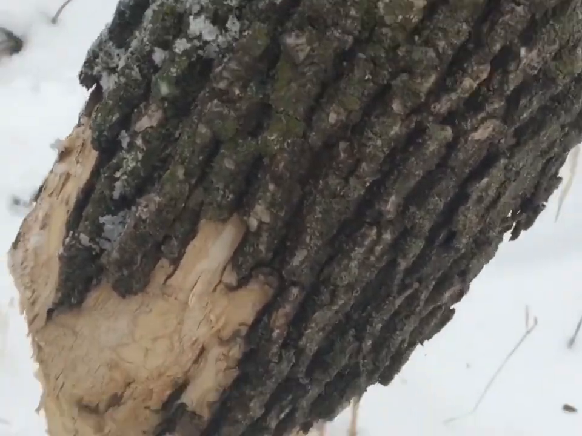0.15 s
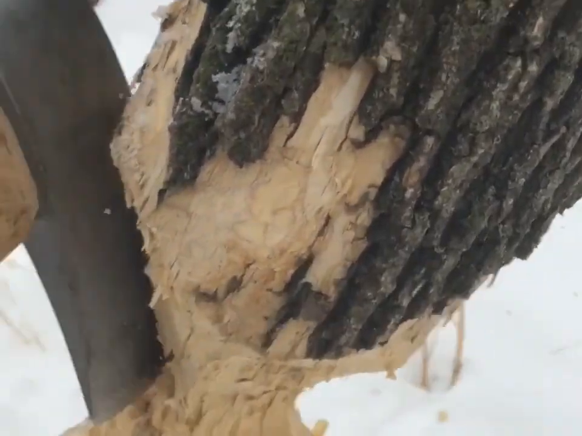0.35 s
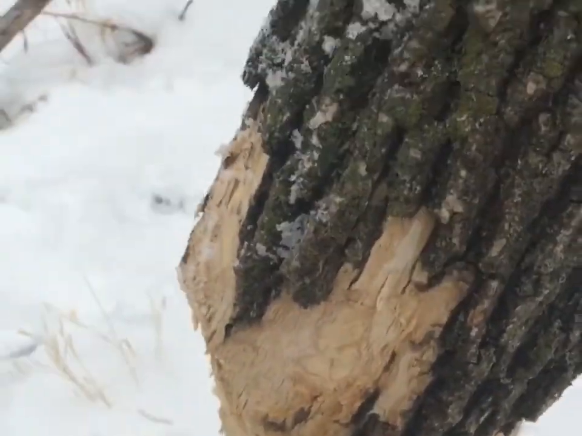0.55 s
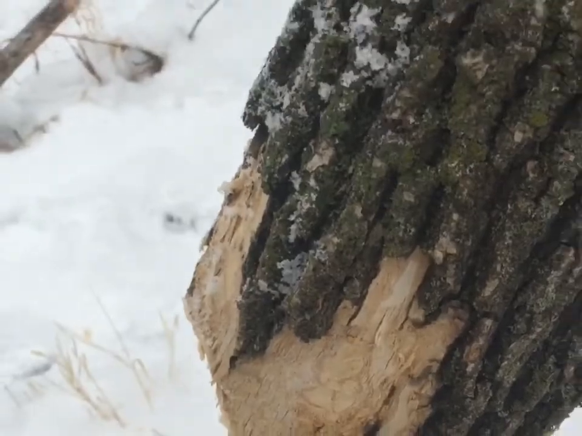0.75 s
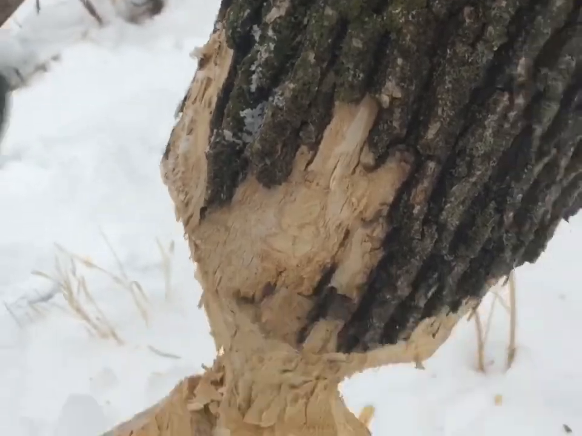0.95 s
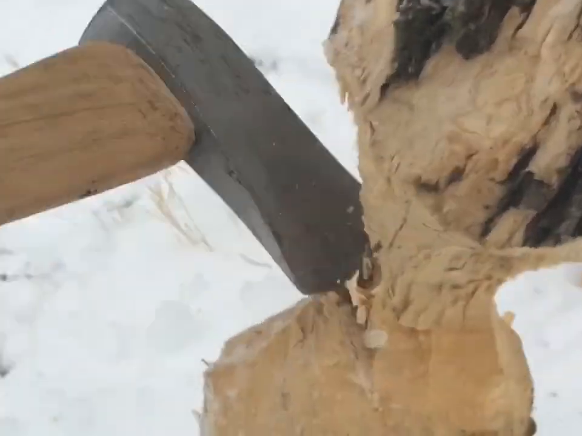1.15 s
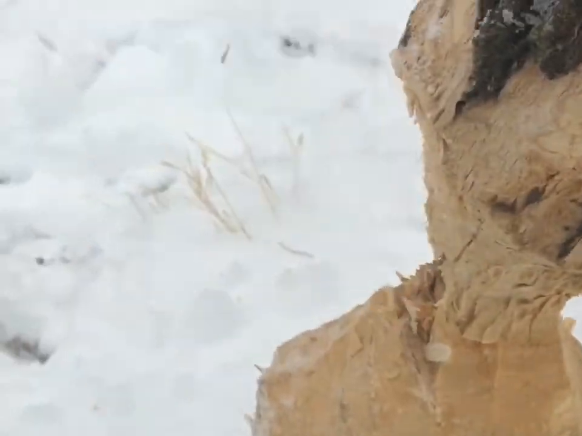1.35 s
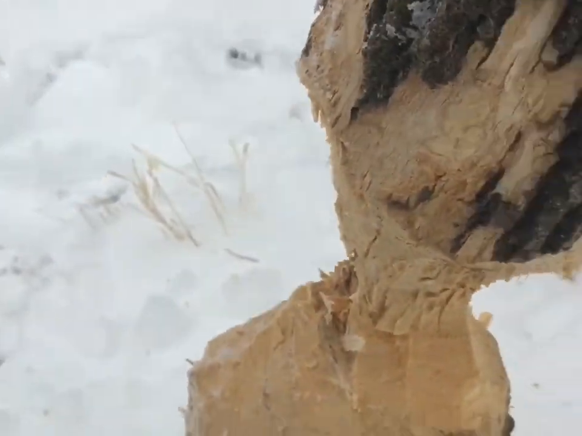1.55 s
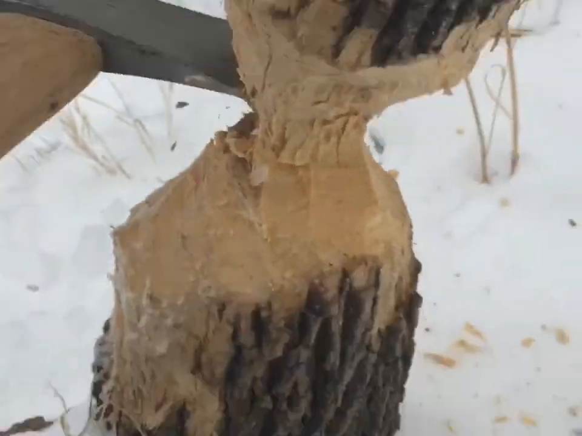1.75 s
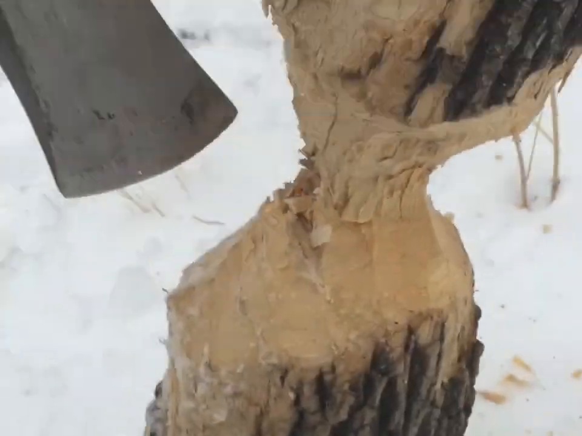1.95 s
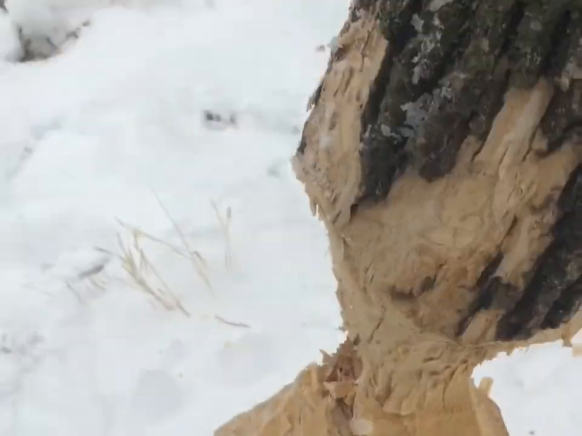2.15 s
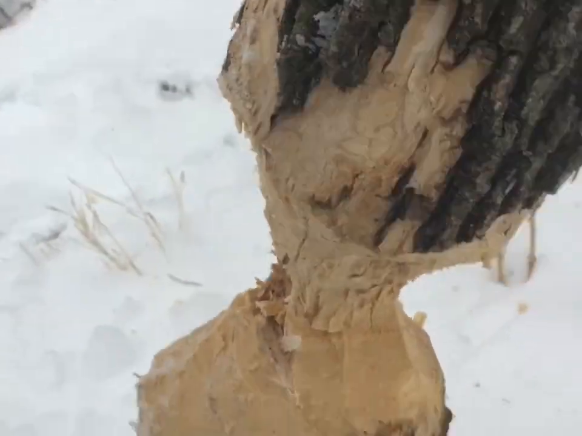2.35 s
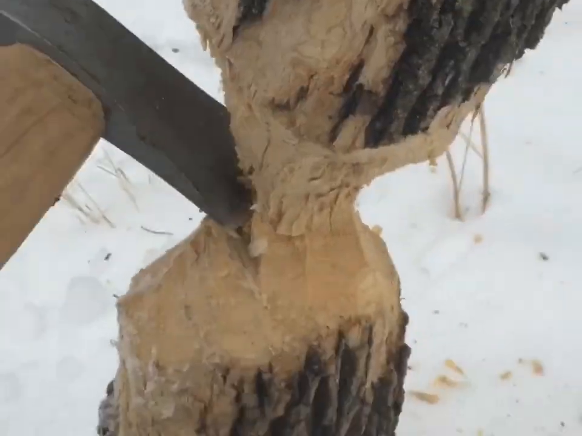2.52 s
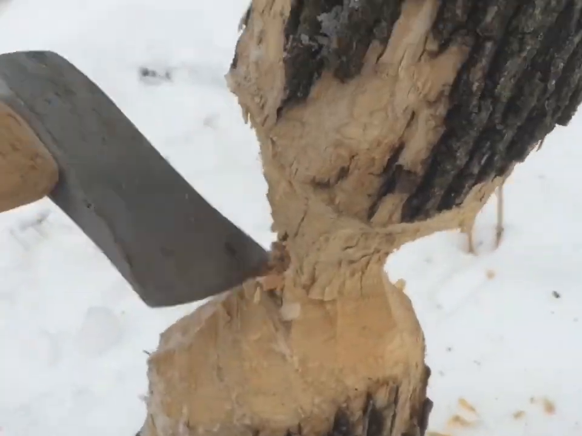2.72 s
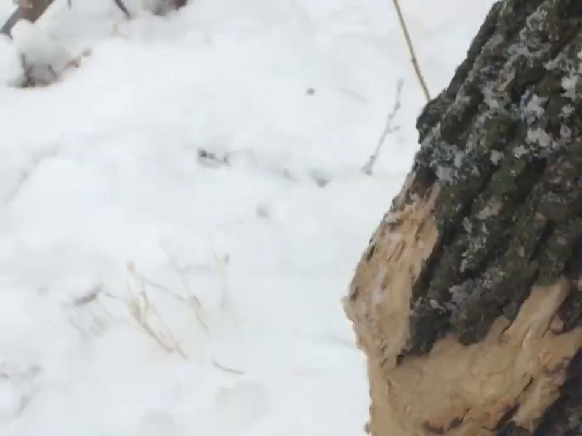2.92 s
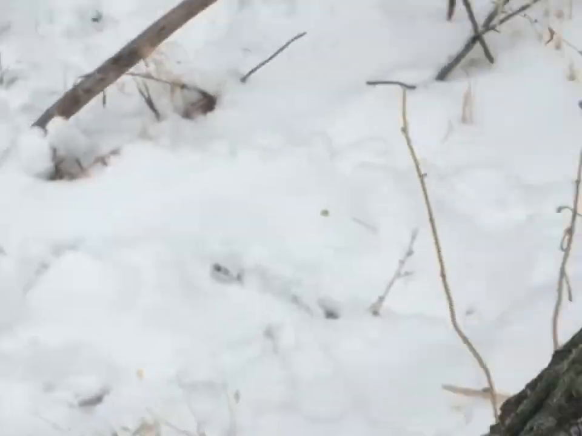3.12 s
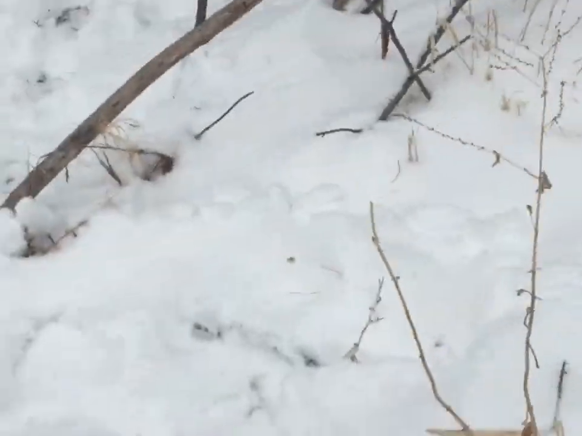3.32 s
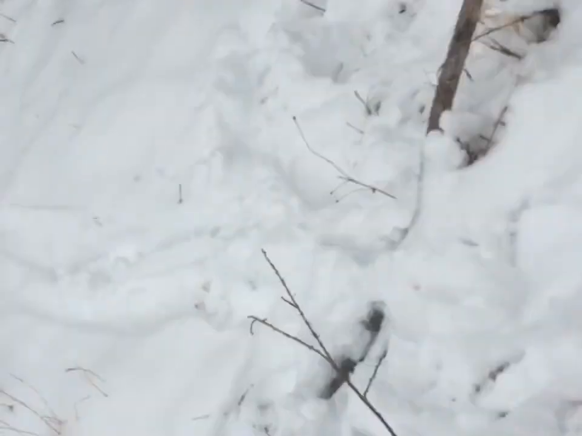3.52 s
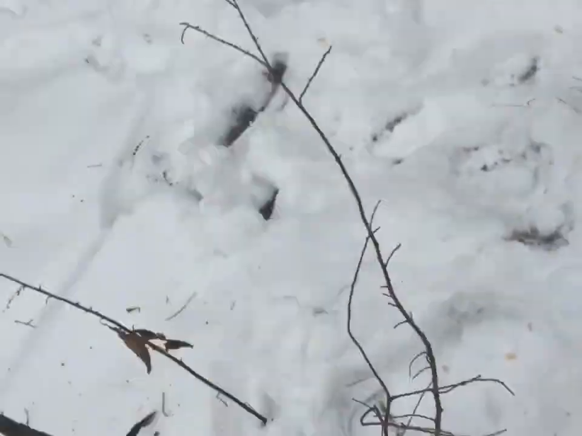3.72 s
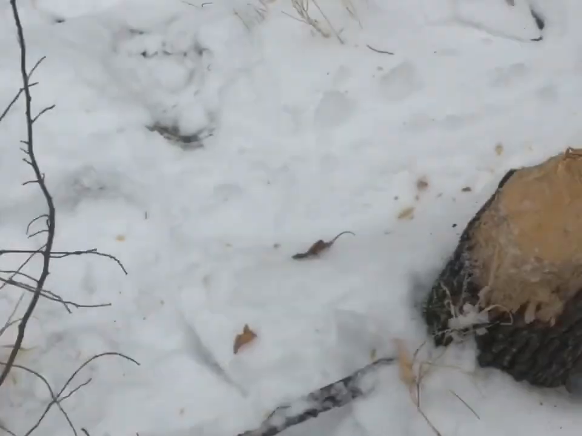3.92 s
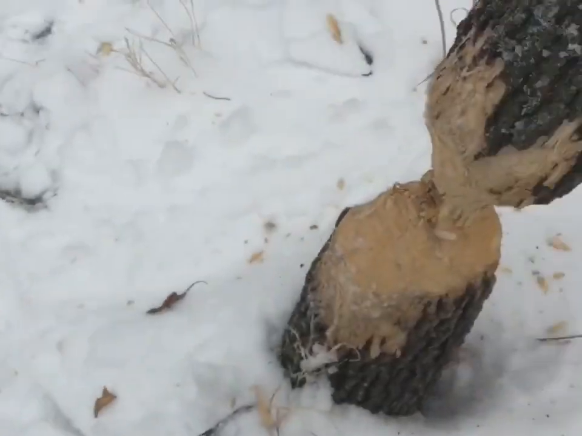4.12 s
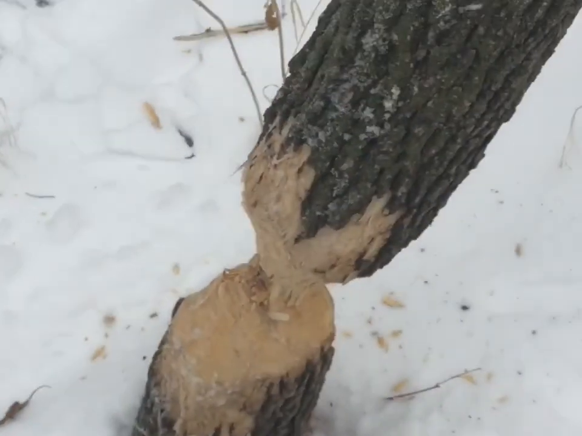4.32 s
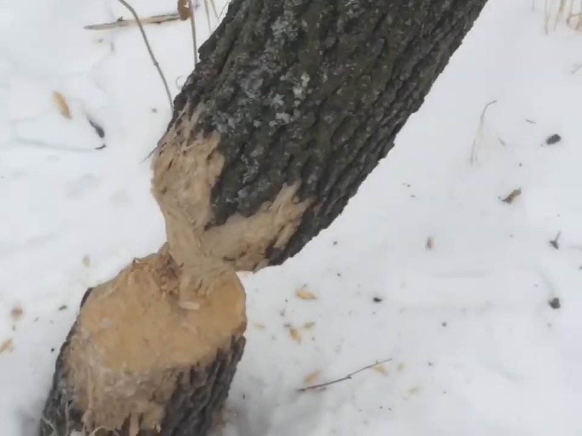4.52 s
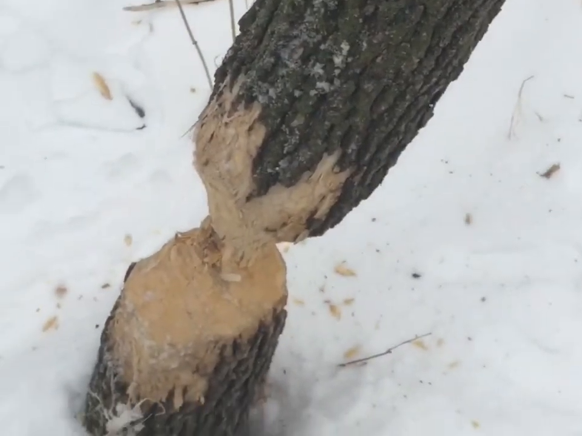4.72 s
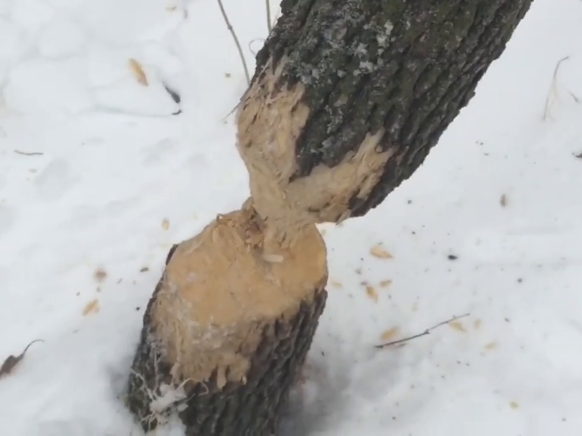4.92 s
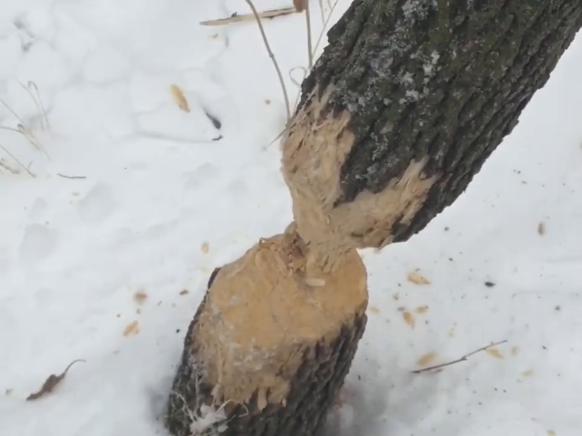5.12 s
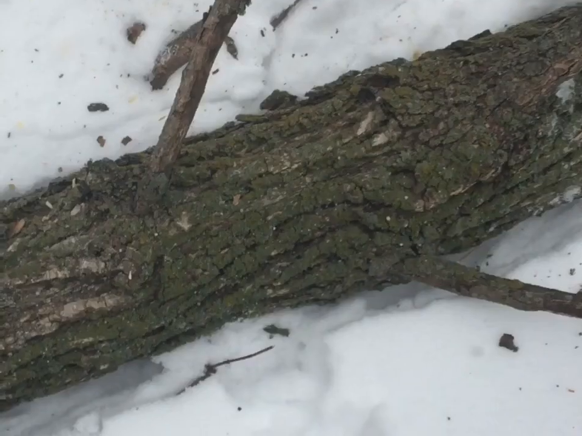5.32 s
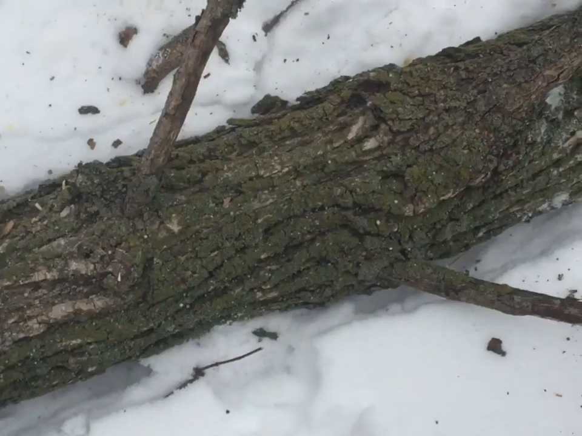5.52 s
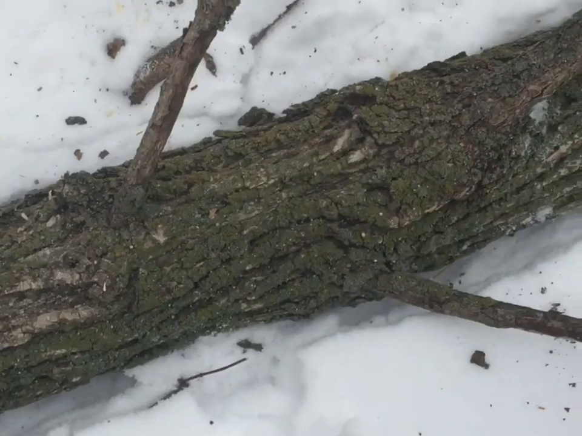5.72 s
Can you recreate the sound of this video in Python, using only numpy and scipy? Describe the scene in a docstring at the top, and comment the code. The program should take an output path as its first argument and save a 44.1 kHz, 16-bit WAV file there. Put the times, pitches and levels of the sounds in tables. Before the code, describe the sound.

A hatchet chops into a tree trunk four times, at about 0.3, 1.1, 1.8 and 2.5 seconds, so close that the blows overload the microphone. Each is a sharp crack of fibres with a woody knock and a short low boom, followed by a faint, dark echo from the woods. The steel head clinks lightly just after the first two chops and rings brightly on the third. The blade scrapes faintly as it is worked free, and a stiff jacket swishes between swings.

From about 2.8 seconds everything is much quieter. The jacket rustles, and boots press into snow with dull, soft crunches from 3.4 to 4.5 seconds, ending in a very faint squeak. Small snaps of twigs or chips and soft bumps are scattered throughout, the clearest snap near 3.4 seconds. The last soft knocks fall around 5 seconds, leaving still air and a faint low rumble until nearly 6.

```python
"""Hatchet on a leaning trunk

Snowy woods, one microphone so close to the notch that the four chops overload it. Each chop cracks the
fibres, knocks and sets the trunk booming; the steel head rings when it glances off or comes free.
A jacket swishes between swings, then feet shift in the snow and a few soft knocks follow.
Behind it all lie a faint echo from the trees and still winter air."""
import sys
import numpy as np
from scipy import signal
from scipy.fft import rfft, irfft
from scipy.io import wavfile

SR = 44100
rng = np.random.default_rng(int(sys.argv[2]) if len(sys.argv) > 2 else 0)


def put_to_file(sound):
    """Save the sound as 16-bit audio at rate SR, in the file named by the first command-line argument."""
    columns = np.atleast_2d(sound).T  # one column per channel
    safe = np.clip(columns, -1, 1)
    whole_steps = np.round(safe * 32767)
    wavfile.write(sys.argv[1], SR, whole_steps.astype(np.int16))


N = 254016
TIME = np.arange(N) / SR
AGE = np.arange(SR) / SR  # seconds since a blow
BRIEF = SR // 8  # samples in which a small sound dies away
TOP_HZ = 16400  # upper edge of the microphone's range

# chops: t/s, trunk/dB, push length/s, knock f/Hz, knock/dB, crack/dB, crack brightness/dB, steel/dB
CHOPS = [(0.3196, 1, 0.0023, 1103, 10, 8.5, -7, -47), (1.0712, 3, 0.00069, 1014, 9, 7.5, 0, -41),
         (1.7931, 1, .0034, 746, 3.5, 5, 5.5, -8), (2.5480, 2, 0.0021, 1022, 8, 8, -2.5, -42.5)]
# bending modes of the trunk: f/Hz, level/dB, t60/s
TRUNK_MODES = [(52, -31, 0.3), (72, -29.5, 0.51), (80.6, -5.5, 0.11), (98.4, -3, 0.044), (121, -32, 0.44),
               (136, 1, 0.069), (145, -12, .124), (189, -19.5, 0.17), (226, -17, 0.11), (252, -11.5, 0.076),
               (284, -3.5, 0.053), (317, -7, 0.105), (430, -7, 0.065), (475, -19, .07), (582, -16, .075),
               (667, -21, 0.06)]
# side modes of the cut: f/knock pitch, level/dB, t60/s
KNOCK_MODES = [(.4, -11, .035), (.77, -9, .024), (1.28, -18, .02), (1.7, -17, .02), (2.25, -18, .016)]
# modes of the steel head, the blade's two flexing modes first: f/Hz, level/dB, t60/s
STEEL_MODES = [(3454, -1.5, 0.07), (3550, -4.5, 0.055), (4480, 2, 0.027), (7100, -21.5, .033),
               (8400, -23, 0.067), (11350, -23, .034), (12400, -28, .036)]
# wood tapped by the blade: f/Hz, level/dB, t60/s
CLACK_MODES = [(450, -3, 0.023), (1120, 0.5, 0.015), (1850, -13.5, 0.02)]
# the blade touches the wood: t/s, steel/dB, its upper modes/dB, clack/dB, tick/dB
TOUCHES = [(0.3691, -20.5, -10, -8, -18.5), (1.114, -47, 1, -56, -37), (1.192, -66, 19, -64, -47),
           (1.21, -22.5, 6, -28, -24.5), (1.847, -57, 3, -42.5, -36), (1.893, -45.5, 9.5, -63, -43)]
# the blade is levered out of the cut: t/s, length/s, level/dB
SCRAPES = [(0.359, 0.028, -36), (0.407, 0.072, -59.5), (1.806, 0.11, -49.5), (1.901, 0.09, -59.5),
           (1.99, 0.1, -57), (2.682, 0.08, -61), (2.753, 0.18, -50.5)]
# twigs and chips snap: t/s, peak/dB, f/Hz, width/Hz
SNAPS = [(0.298, -29, 1090, 875), (0.309, -28.5, 1040, 1090), (1.013, -41, 594, 340),
         (1.324, -31.5, 1790, 2940), (1.355, -35, 780, 1200), (1.648, -38.5, 2140, 2470),
         (2.114, -44, 3570, 2500), (2.315, -49, 700, 900), (2.527, -39.5, 882, 1300),
         (2.590, -35, 4000, 8000), (2.767, -36, 875, 2480), (3.283, -41, 2155, 1270),
         (3.353, -25, 660, 1380), (3.354, -33.5, 4470, 7000), (3.445, -35, 7020, 8940),
         (3.781, -33, 1210, 2000), (4.428, -38.5, 1607, 990), (4.628, -39, 694, 738),
         (4.899, -49, 7020, 9000), (4.991, -45, 497, 796)]
# dull bumps of boots and hands: t/s, peak/dB, f/Hz
BUMPS = [(0.074, -48, 70), (1.321, -37.5, 267), (1.354, -34, 312), (1.976, -40, 383), (2.316, -44.5, 200),
         (2.934, -35, 262), (3.428, -39.5, 261), (3.473, -39.5, 136), (3.491, -37.5, 55),
         (3.572, -38.5, 161), (3.752, -35.5, 153), (3.816, -39, 163), (3.941, -42.5, 280),
         (4.212, -43, 156.4), (4.268, -47.5, 518), (4.301, -45.5, 89.7), (4.422, -44, 170),
         (4.626, -35, 160.7), (4.992, -35.5, 170), (5.342, -51.5, 404.5)]
# movements that rub the jacket: fastest at t/s, rise/s, fall/s, swish/dB, hiss/dB
STROKES = [(0.008, 0.02, 0.025, -46.5, -54), (0.45, 0.21, .035, -62.5, -57),
           (0.548, 0.031, 0.053, -44, -51), (0.701, 0.16, 0.042, -53, -60), (1.309, .06, .2, -47, -56.5),
           (1.45, 0.18, 0.073, -43, -48), (1.486, 0.033, 0.021, -36.5, -50),
           (2.025, 0.1, 0.081, -43, -54.5), (2.066, .04, 0.026, -44.5, -57.5),
           (2.719, .17, 0.034, -58.5, -68), (2.81, .06, 0.12, -46, -51),
           (2.883, 0.054, 0.043, -39.5, -44.5), (2.94, 0.12, 0.14, -49.5, -54.5),
           (3.28, 0.38, 0.33, -61, -70.5), (3.45, .09, 0.085, -53.5, -60.5),
           (3.748, 0.044, 0.066, -47, -58), (3.72, 0.15, 0.33, -52.5, -63), (3.925, .13, 0.12, -41.5, -50),
           (4.20, .19, 0.15, -53, -62), (4.232, .03, .028, -73, -49), (4.41, .13, 0.13, -60, -67.5)]
# boots press the snow: full weight at t/s, rise/s, fall/s, level/dB
STEPS = [(3.43, 0.039, 0.089, -52.5), (3.619, 0.12, 0.18, -50.5), (3.76, 0.074, 0.095, -44.5),
         (3.92, 0.2, .11, -42), (4.23, .1, 0.12, -56.5), (4.42, .08, 0.092, -57.5)]
# echo from the trees: f/Hz, level/dB, t60/s
ECHO_BANDS = [(39.84, -15, .8), (90, 2, 1), (310, -2, 1), (705, -9, 0.8), (1520, -19, 0.92),
              (4000, -18.5, .3), (15000, -26.5, .25)]
# rumble of air on the microphone: t/s, level/dB
RUMBLE_LEVELS = [(0, -66), (.9, -63.5), (1.6, -61.5), (2.3, -65), (3.1, -60), (3.8, -56), (4.5, -65.5),
                 (5.2, -70), (5.76, -78.5)]

# spectra of the noisy sources: f/Hz, level/dB
FIBRE_SPECTRUM = [(300, -12), (900, -2), (1800, 1.5), (2600, -3), (4200, 3.5), (6000, -4), (9000, -5),
                  (15000, -12.5)]
CLOTH_SPECTRUM = [(290, -37), (500, -11.5), (631, -7), (1400, -8), (2100, -1), (3390, -6), (3650, -4),
                  (3920, -4.5), (4940, -11), (9220, -11), (10500, -19.5), (13100, -15.5), (16000, -25.5)]
SNOW_SPECTRUM = [(35, -12.5), (60, 5.5), (113, 0.5), (445, -4), (559, -1.5), (753, -14.5), (1150, -14),
                 (1630, -12), (1950, -50), (4000, -17.5), (5200, -24), (8800, -70)]
AIR_SPECTRUM = [(15, -48.5), (25, -21.5), (43, -4.5), (64, -11), (145, -24), (1480, -27), (4030, -30),
                (5000, -31.5), (6380, -30), (10400, -38), (11600, -37.5), (16000, -43)]
GUST_SPECTRUM = [(120, -3.5), (280, 1.5), (600, -10.5), (1500, -20.5), (4000, -36)]
FOLD_SPECTRUM = [(900, -5.5), (2200, -1), (3800, 1), (6000, -15)]
SCATTER_SPECTRUM = [(300, -2.5), (420, 3), (600, 3.5), (1080, -4), (1450, -12), (2200, -18.5),
                    (4000, -25.5)]
RUMBLE_SPECTRUM = [(35, -10.5), (60, -4), (150, -5.5), (400, -15.5), (1200, -20.5)]


def chops(knock_lag_s=0.0004, stop_s=0.0055):
    """Right at the microphone the edge cracks in, the cut knocks and the stopping head booms the trunk."""
    out = np.zeros(N)
    for s, trunk_db, push_s, knock_hz, knock_db, crack_db, bright_db, steel_db in CHOPS:
        add(out, s, undb(crack_db) * crack(bright_db) + woods())
        add(out, s, undb(steel_db) * steel(upper_db=-14.5))
        add(out, s + knock_lag_s, undb(knock_db) * knock(knock_hz))
        add(out, s + stop_s - push_s / 2, undb(trunk_db) * boom(push_s))  # push peaks as the head stops
    return out


def crack(bright_db, bite_s=0.0017, t60=0.011, splinter_db=-38, splinter_t60=0.065):
    """Fibres burst while the edge sinks in, then splinters crackle on; a keen bite lifts the treble."""
    shelf_db = bright_db * np.interp(np.fft.rfftfreq(SR, 1 / SR), [1500, 4000, 15000], [0, 0.5, 1])
    fibres = irfft(rfft(noise(FIBRE_SPECTRUM, SR)) * undb(shelf_db))
    burst = fibres * np.minimum(AGE / bite_s, 1) * fade(t60)
    splinters = colour(grains(rate=2500, spread_db=0.5, size=SR), FIBRE_SPECTRUM) * fade(splinter_t60)
    return burst + undb(splinter_db) * splinters


def knock(hz, cycles=21, rise_s=0.001):
    """The wood at the cut rings briefly in one main mode and weaker side modes."""
    side_modes = [(ratio * hz, db, t60) for ratio, db, t60 in KNOCK_MODES]
    return ring([(hz, 0, cycles / hz)] + side_modes) * (1 - np.exp(-AGE / rise_s))


def boom(push_s):
    """The head pushes the trunk into bending; a longer push wakes fewer high modes."""
    push = np.sin(np.pi * np.minimum(AGE / push_s, 1))
    return signal.fftconvolve(ring(TRUNK_MODES), push / push.sum())[:SR]


def steel(upper_db):
    """The head rings; a glancing touch wakes its upper modes more."""
    return ring(STEEL_MODES[:2], BRIEF) + undb(upper_db) * ring(STEEL_MODES[2:], BRIEF)


def touches(tick_t60=0.018):
    """The blade glances off the notch or comes free: a tick, a clack and ringing steel."""
    out = np.zeros(N)
    clack = ring(CLACK_MODES, BRIEF)
    for s, steel_db, upper_db, clack_db, tick_db in TOUCHES:
        tick = noise(FIBRE_SPECTRUM, BRIEF) * fade(tick_t60, BRIEF)
        add(out, s, undb(steel_db) * steel(upper_db) + undb(clack_db) * clack + undb(tick_db) * tick)
    return out


def scrapes(rasp_db=-3):
    """Steel sticks and slips against the wood, which keeps the head ringing."""
    slips = grains(rate=1500, spread_db=2)
    ringing = unit(signal.oaconvolve(slips, steel(upper_db=-1))[:N])
    rasp = undb(rasp_db) * colour(slips, FIBRE_SPECTRUM)
    effort = sum(undb(db) * np.interp(TIME, s + length_s * np.array([0, 0.2, 0.8, 1]), [0, 1, 1, 0])
                 for s, length_s, db in SCRAPES)
    return (ringing + rasp) * effort


def swings(gust_db=-32):
    """The head pushes a dull gust of air ahead of it just before it lands."""
    return undb(gust_db) * downswings(grow_s=0.012) * noise(GUST_SPECTRUM)


def snaps(t60=0.0092):
    """Twigs and chips break, each with a short, dry burst around one pitch."""
    out = np.zeros(N)
    for s, db, hz, width_hz in SNAPS:
        burst = rng.standard_normal(BRIEF) * fade(t60, BRIEF) + 1e-18
        pitched = resonate(resonate(burst, hz, width_hz), hz, width_hz)
        snap = lowpass(pitched, min(hz + width_hz, TOP_HZ), order=3)
        add(out, s, undb(db) * snap / np.abs(snap).max())
    return out


def bumps(t60=0.061, rise_s=0.00079):
    """Boots and hands land in soft knocks that die quickly."""
    out = np.zeros(N)
    onset = (1 - np.exp(-AGE[:BRIEF] / rise_s)) ** 2
    for s, db, hz in BUMPS:
        bump = onset * ring([(0.67 * hz, -4, t60), (hz, 0, t60), (1.71 * hz, -7, t60 / 2)], BRIEF)
        add(out, s, undb(db) * bump / np.abs(bump).max())
    return out


def jacket(swish_db=-2.5, hiss_db=-2, split_hz=6500, crinkle_db=-7, fold_t60=0.008):
    """Close by, stiff cloth slides over itself in dense tiny slips and its folds crinkle."""
    slips = colour(grains(rate=5200, spread_db=-3), CLOTH_SPECTRUM)
    buckles = grains(rate=200, spread_db=2.5)
    folds = signal.oaconvolve(buckles, rng.standard_normal(BRIEF) * fade(fold_t60, BRIEF))[:N]
    crinkle = undb(crinkle_db) * colour(folds, FOLD_SPECTRUM)
    swish = flutter(lowpass(slips, split_hz) + crinkle, depth_db=4.5, rate=36)
    hiss = unit(highpass(highpass(slips, split_hz), split_hz))
    swishing, hissing = rubbing()
    return undb(swish_db) * swishing * swish + undb(hiss_db) * hissing * hiss


def rubbing(rest_s=4.67, settle_s=0.21, ease=1.39):
    """Strength of the cloth's swish and hiss: fidgeting, downswings and single strokes add in power."""
    # each movement: speed, swish/dB, hiss/dB
    fidget = (np.clip((rest_s - TIME) / settle_s, 0, 1), -67.5, -73)
    swing = (downswings(grow_s=0.085), -54.5, -55)
    strokes = [(swell(s, rise_s, fall_s) ** ease, swish_db, hiss_db)
               for s, rise_s, fall_s, swish_db, hiss_db in STROKES]
    speeds, swish_db, hiss_db = zip(fidget, swing, *strokes)
    return np.sqrt(undb([swish_db, hiss_db]) ** 2 @ np.square(speeds))


def boots(crunch_db=-1, ease=1.23):
    """Snow packs underfoot in many dull little collapses as the weight comes gently on and off."""
    weight = sum(undb(db) * swell(s, rise_s, fall_s) ** ease for s, rise_s, fall_s, db in STEPS)
    collapses = colour(grains(rate=570, spread_db=1.5), SNOW_SPECTRUM)
    return undb(crunch_db) * weight * flutter(collapses, depth_db=2.5, rate=16)


def squeak(start_s=4.4, length_s=0.22, from_hz=1900, to_hz=1550, squeak_db=-64, rough_hz=110):
    """A faint creak that sinks in pitch as a boot takes weight."""
    load = swell(start_s + length_s / 2, length_s / 2, length_s / 2) ** 0.5
    hz = np.interp(TIME, [start_s, start_s + length_s], [from_hz, to_hz])
    roughness = unit(lowpass(rng.standard_normal(N), rough_hz))
    return undb(squeak_db) * load * roughness * np.sin(2 * np.pi * np.cumsum(hz) / SR)


def woods(scatter_db=-20, scatter_t60=0.135, echo_db=-41, build_s=0.02):
    """Nearby wood and ground scatter a chop at once; trees farther off return a faint, dark echo."""
    near = noise(SCATTER_SPECTRUM, SR) * fade(scatter_t60)
    centres_hz, _, t60s = np.transpose(ECHO_BANDS)
    bands = split(noise(ECHO_BANDS, SR), centres_hz)
    far = sum(band * fade(t60) for band, t60 in zip(bands, t60s))
    return undb(scatter_db) * near + undb(echo_db) * far * (1 - np.exp(-AGE / build_s))


def air(still_db=-69.5):
    """Still winter air, with a low rumble while the microphone moves."""
    rumble_db = np.interp(TIME, *np.transpose(RUMBLE_LEVELS))
    rumble = undb(rumble_db) * noise(RUMBLE_SPECTRUM)
    return undb(still_db) * noise(AIR_SPECTRUM) + rumble


def downswings(grow_s):
    """An envelope that grows by a factor e every grow_s and stops at each chop."""
    out = np.zeros(N)
    for s, *_ in CHOPS:
        swing = np.exp(-AGE[:int(s * SR)] / grow_s)[::-1]
        add(out, s - len(swing) / SR, swing)
    return out


def swell(s, rise_s, fall_s):
    """A movement gathers to 1 at time s and dies away."""
    return np.interp(TIME, [s - rise_s, s, s + fall_s], [0, 1, 0])


def fade(t60, size=SR):
    """Exponential decay after a blow."""
    return np.exp(-np.log(1000) * np.minimum(AGE[:size] / t60, 10))


def ring(modes, size=SR):
    """Fading modes, starting in alternate directions."""
    return sum((-1) ** k * undb(db) * fade(t60, size) * np.sin(2 * np.pi * hz * AGE[:size])
               for k, (hz, db, t60) in enumerate(modes))


def grains(rate, spread_db, size=N):
    """Random clicks of uneven size, about rate a second; rms 1."""
    out = np.zeros(size)
    hits = rng.random(size) < rate / SR
    excess = np.minimum(rng.exponential(size=size)[hits], 5)
    out[hits] = undb(spread_db * excess) * rng.standard_normal(size)[hits]
    return unit(out)


def flutter(x, depth_db, rate, centres_hz=(500, 1100, 1900, 3000, 5000)):
    """Neighbouring bands swell and sink on their own, so the colour keeps shifting; rms 1."""
    return unit(sum(band * waver(depth_db, rate) for band in split(x, centres_hz)))


def waver(depth_db, rate):
    """A gain that wanders at random about 1, rate times a second."""
    gains = undb(depth_db * rng.standard_normal(N // 200))
    return np.interp(TIME * rate, np.arange(len(gains)), gains)


def noise(spectrum, size=N):
    """Steady noise with the given spectrum; rms 1."""
    return colour(rng.standard_normal(size), spectrum)


def colour(x, spectrum):
    """Shape x by (f/Hz, level/dB) points, falling away outside them; rms 1."""
    hz, db = np.transpose(spectrum)[:2]
    f = np.maximum(np.fft.rfftfreq(len(x), 1 / SR), 1)
    gain = undb(np.interp(np.log(f), np.log(hz), db))
    skirts = np.minimum(f / hz[0], 1) ** 2 * np.minimum(hz[-1] / f, 1) ** 2
    return unit(irfft(rfft(x) * gain * skirts, len(x)))


def split(x, centres_hz):
    """Overlapping bands that add up to x."""
    log_hz = np.log(np.maximum(np.fft.rfftfreq(len(x), 1 / SR), 1))
    spectrum = rfft(x)
    return [irfft(spectrum * np.interp(log_hz, np.log(centres_hz), share), len(x))
            for share in np.eye(len(centres_hz))]


def resonate(x, hz, width_hz):
    """One resonance, gain 1 at its centre."""
    return signal.lfilter(*signal.iirpeak(hz, hz / min(width_hz, SR / 4), fs=SR), x)


def lowpass(x, hz, order=2):
    """The part of x below hz."""
    return signal.sosfilt(signal.butter(order, hz, fs=SR, output="sos"), x)


def highpass(x, hz):
    """The part of x above hz."""
    return signal.sosfilt(signal.butter(2, hz, "high", fs=SR, output="sos"), x)


def add(track, s, sound):
    """Mix a sound into the track at time s."""
    start = max(int(s * SR), 0)
    track[start:start + len(sound)] += sound[:N - start]


def undb(db):
    """Decibels to gain."""
    return 10 ** (np.asarray(db) / 20)


def unit(x):
    """Scale to rms 1."""
    return x / np.sqrt(np.mean(x ** 2))


def scene():
    """Everything in mono, at one microphone close to the notch."""
    hatchet = swings() + chops() + touches() + scrapes()
    return (hatchet + snaps() + bumps() + jacket() + boots() + air() + squeak())[None]


def record(dry):
    """The microphone sheds the deepest bass and clips flat on the chops; the top is cut."""
    clipped = np.clip(highpass(dry, hz=46), -1, 1)
    return signal.sosfilt(signal.ellip(8, 0.1, 60, TOP_HZ, fs=SR, output="sos"), clipped)


dry = scene()
out = record(dry)
put_to_file(out)
```